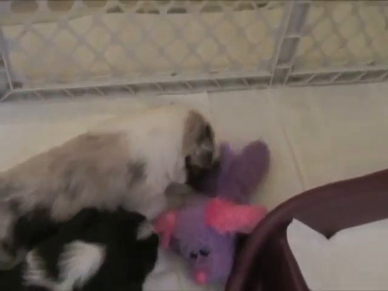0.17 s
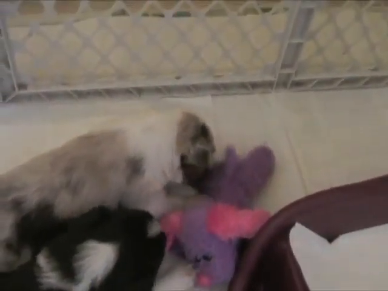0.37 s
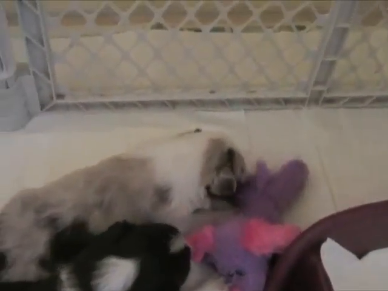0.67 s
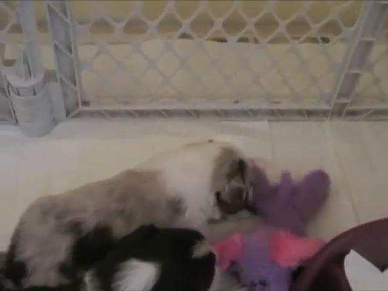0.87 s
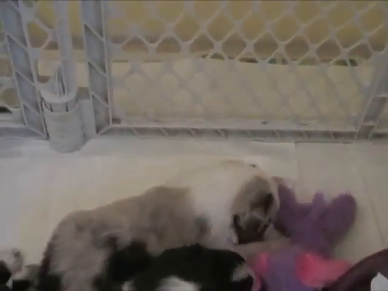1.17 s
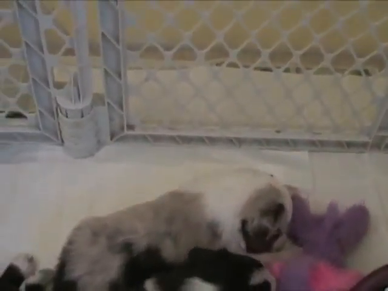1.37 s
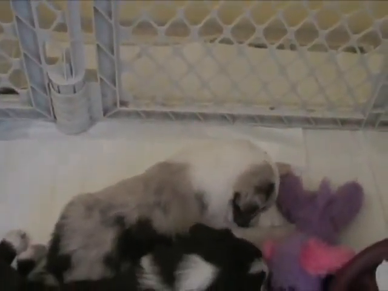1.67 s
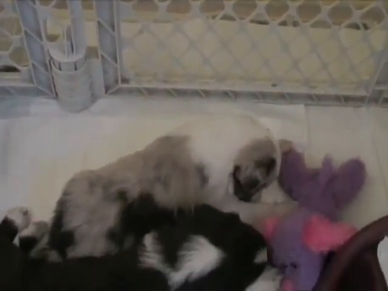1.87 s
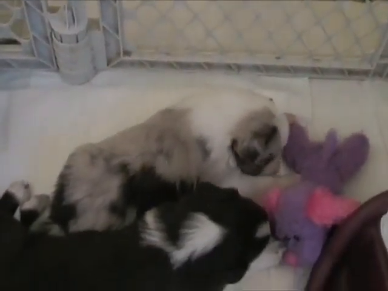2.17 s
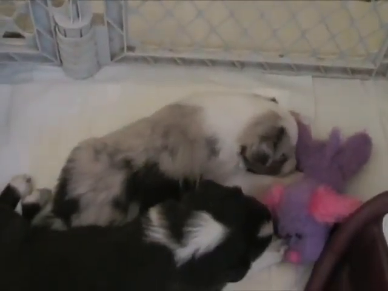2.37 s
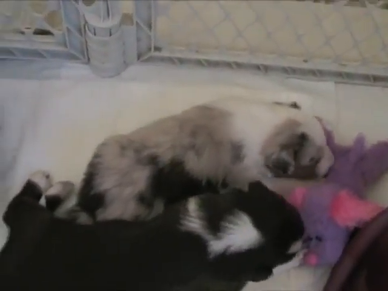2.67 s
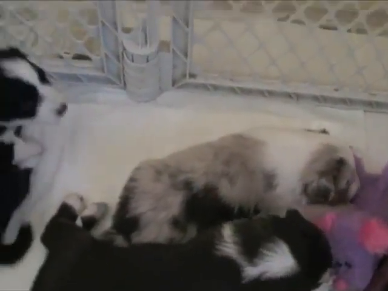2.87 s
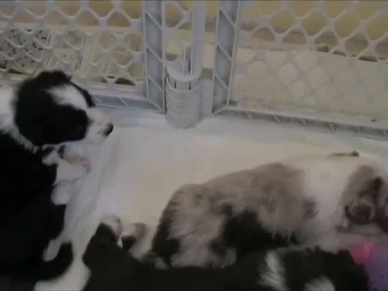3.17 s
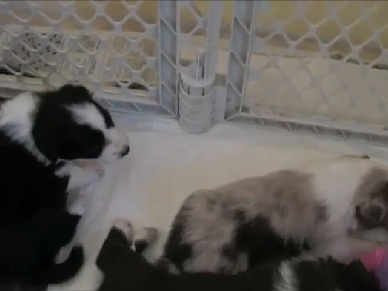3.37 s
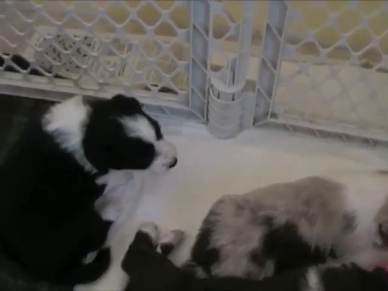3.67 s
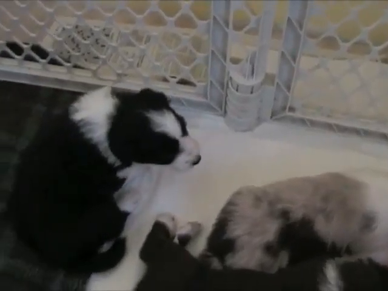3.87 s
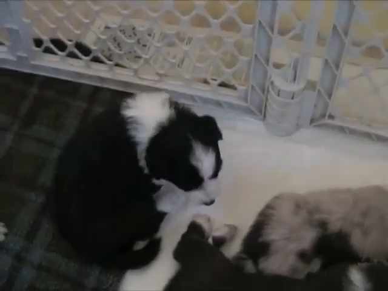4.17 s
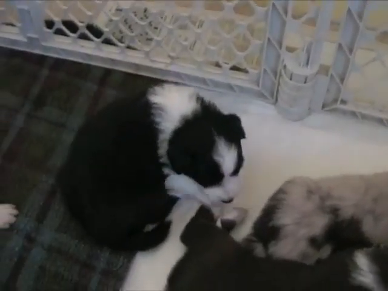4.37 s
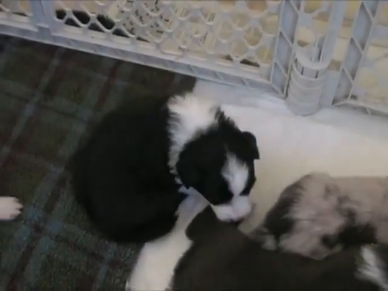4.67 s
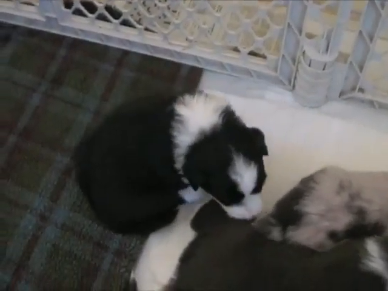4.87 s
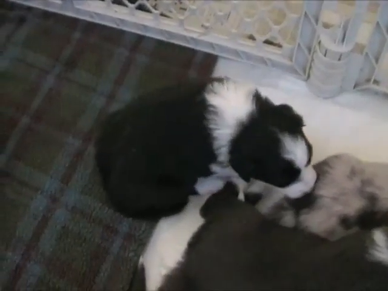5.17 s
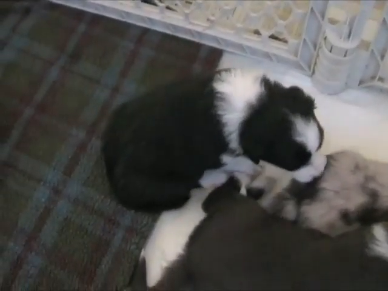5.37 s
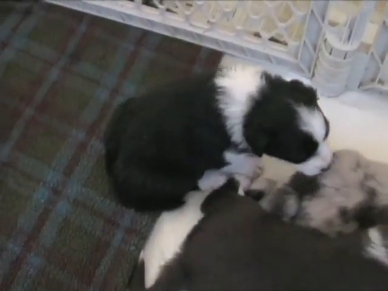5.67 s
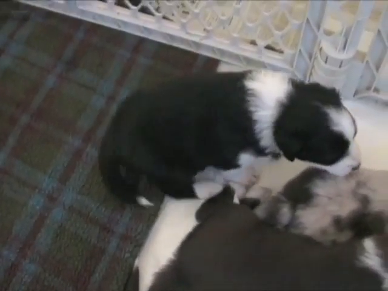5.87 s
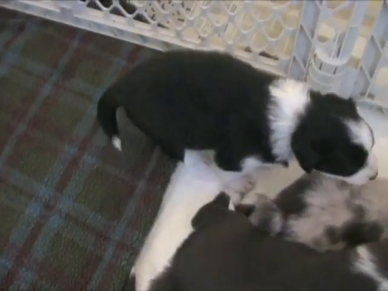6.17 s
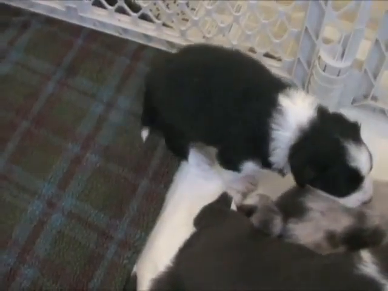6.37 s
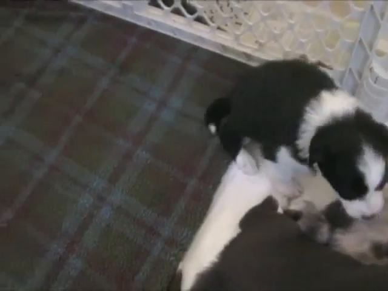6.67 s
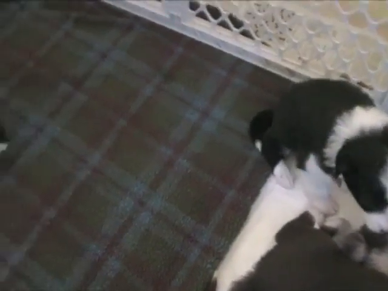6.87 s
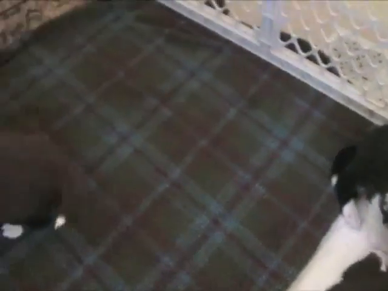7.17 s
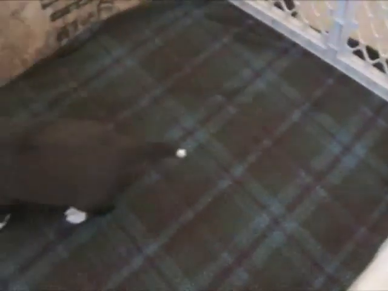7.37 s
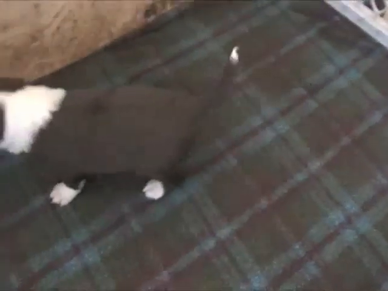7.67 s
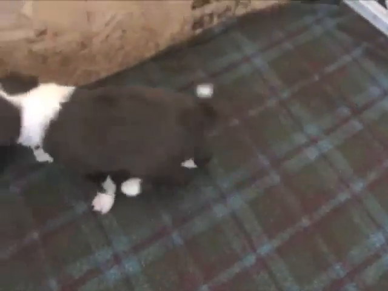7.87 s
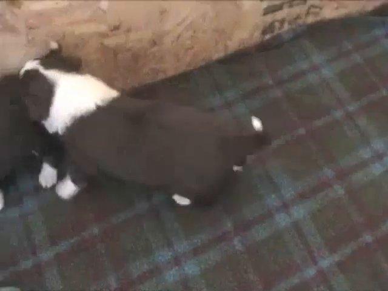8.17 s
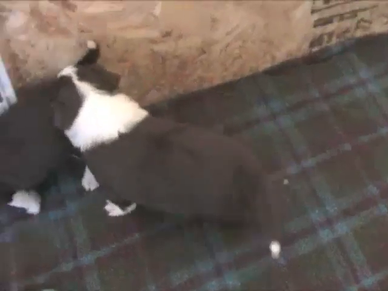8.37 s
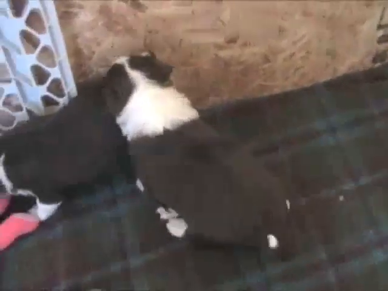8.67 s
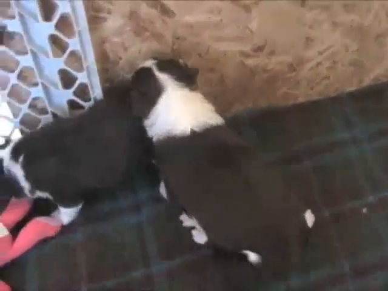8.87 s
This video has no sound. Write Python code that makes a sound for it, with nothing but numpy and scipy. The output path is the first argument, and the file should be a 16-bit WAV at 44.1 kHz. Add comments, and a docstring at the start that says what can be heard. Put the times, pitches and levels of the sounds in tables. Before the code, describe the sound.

Faint hiss and a thin camera whine, soft bumps, bedding rustle and claw ticks on a plastic pen fill the first second and a half. A puppy farther off gives a falling yelp and low woofs, then nearby puppies cry one after another in short, high, gliding calls, some hoarse or cracking. Later cries sink lower and softer, ending with rustling and a last yip. Close stereo microphones in a small, reverberant room.

```python
"""Hiss, a faint camera whine and a soft bump open the scene; bedding rustles and claws tick on a plastic pen.
Then a young puppy calls from farther off in the small room, and nearer ones cry, yip and whimper.
Each cry is a gliding harmonic voice, with rasp while the folds settle or crack; a thin high squeak closes
many of the near ones. Contacts are dying bursts of coloured noise, rubs swelling grainy noise, the whine sines.
Two close microphones hear all this with dense wall echoes, the left a little later than the right."""
import sys
import numpy as np
from scipy import signal
from scipy.fft import rfft, irfft, next_fast_len
from scipy.io import wavfile

SR = 44100
rng = np.random.default_rng(int(sys.argv[2]) if len(sys.argv) > 2 else 0)


def materialize(psi):
    """Save the field psi as 16-bit PCM at rate SR to the path in sys.argv[1].

    A 1-D psi becomes a single channel; in a 2-D psi each row is a channel.
    """
    bounded = np.clip(np.atleast_2d(psi).T, -1, 1)
    quanta = np.round(bounded * 32767).astype(np.int16)
    wavfile.write(sys.argv[1], SR, quanta)


N = 397341
TIME = np.arange(N) / SR
CUTOFF_HZ = 12700   # no voice harmonics are made above this

# the long near cries: overtones level/dB, bright upper harmonics level/dB, hoarse start t/s, rasp level/dB,
# half-pitch tone level/dB, closing squeak level/dB (practically silent near -75 and below),
# course of the voice as (t/s, f/Hz, level/dB before trim)
CRIES = [ (5.5, -40.5, 0.087, -16.5, -40, -54, [(2.67, 703.1, -35.5), (2.7, 586, -30.5), (2.722, 726, -29),
         (2.736, 766, -29), (2.764, 848.4, -23), (2.796, 849, -26), (2.81, 944, -34.5)]),
         (-0.5, -48, 0.07, -3.5, -15.5, -58, [(3.085, 503, -42.5), (3.115, 477.5, -34), (3.153, 662, -30.5),
         (3.177, 806, -37), (3.197, 883, -36.5), (3.251, 1008, -28.5), (3.291, 1085, -31.5),
         (3.329, 1050, -29.5), (3.36, 1024, -41)]), (4.5, -41.5, 0.05, -18.5, -44, -53, [(3.582, 883, -41),
         (3.594, 946, -31.5), (3.618, 825, -31), (3.632, 1035, -24.5), (3.642, 1100, -27.5),
         (3.71, 1067, -29.5), (3.73, 1105, -29.5), (3.758, 1186, -35), (3.765, 1195, -46)]),
         (7, -37.5, 0.024, -28, -35, -54, [(3.968, 1094, -37.5), (3.994, 1115, -29), (4.024, 1272, -39.5),
         (4.036, 1256, -31), (4.042, 1353, -47), (4.058, 1413, -37), (4.125, 1332, -32.5)]),
         (-4.5, -37, 0.02, -32, -10, -59, [(4.312, 988, -34), (4.32, 1001, -26), (4.352, 974, -23.5),
         (4.366, 1127, -29), (4.4, 1154, -24), (4.412, 1112, -35), (4.424, 1106, -24), (4.486, 1054, -26.5),
         (4.494, 983.5, -19), (4.524, 1036, -23.5), (4.549, 1033, -31)]),
         (-5.5, -38.5, 0.0247, -1, -18, -56, [(4.736, 794, -31), (4.752, 735, -32), (4.772, 802, -23),
         (4.784, 807, -26.5), (4.802, 946, -18.5), (4.816, 985, -20.5), (4.856, 917, -22),
         (4.864, 896, -47)]), (1, -44, 0.029, 2.5, -25, -79, [(5.217, 547, -38), (5.235, 533.3, -41),
         (5.249, 566.6, -24.5), (5.285, 817, -27.5), (5.301, 915, -20), (5.315, 968, -31.5),
         (5.327, 907, -38)]), (1, -36, 0.018, -22, -38, -51, [(5.625, 1222, -37), (5.647, 1230, -26.5),
         (5.669, 1372, -34), (5.677, 1370, -28.5), (5.737, 1322, -30.5), (5.751, 1378, -25),
         (5.765, 1350, -34)]), (-0.5, -44.5, .02, -29, -43, -79, [(5.972, 1168, -34.5), (5.99, 1087, -29.5),
         (6.01, 1028, -26.5), (6.03, 1127, -29), (6.07, 1087, -27.5), (6.098, 1046, -26),
         (6.136, 1057, -28.5), (6.158, 1100, -29), (6.17, 1130, -50)]),
         (1, -48, .017, -36, -42, -62, [(6.38, 968, -30), (6.406, 923.5, -22.5), (6.442, 1065, -28.5),
         (6.456, 1088, -24.5), (6.48, 975, -23), (6.52, 906, -20.5), (6.548, 947, -23), (6.564, 961.6, -25),
         (6.588, 894, -22), (6.606, 894, -24.5), (6.618, 973, -24), (6.644, 1042, -29)]),
         (-4.5, -44, 0.063, -1.5, -10.5, -75, [(6.883, 847, -36), (6.907, 807.6, -36.5),
         (6.921, 749, -31.5), (6.945, 860, -28), (6.965, 892, -25.5), (6.989, 866, -24), (7.021, 918, -27),
         (7.067, 862, -24.5), (7.107, 861.8, -25.5), (7.169, 938, -27.5)]),
         (0.5, -46, 0.049, -1.5, -9, -80, [(7.415, 456.4, -40.5), (7.449, 467.3, -34.5),
         (7.527, 518.5, -33), (7.555, 504.6, -33), (7.599, 528, -36), (7.607, 514, -35), (7.667, 517, -31),
         (7.681, 539.3, -32), (7.697, 520.2, -31.5), (7.725, 523.3, -31), (7.807, 511.2, -30.5),
         (7.827, 508.3, -30), (7.861, 529.5, -36), (7.92, 515, -42.5)]),
         (-0.5, -51, 0.033, -2.5, -13.5, -80, [(8.39, 463, -42.5), (8.42, 441, -38.5),
         (8.474, 540.3, -39.5), (8.524, 530.5, -38), (8.544, 564, -37.5), (8.606, 572.5, -37),
         (8.666, 523.7, -34), (8.68, 552, -43), (8.704, 556, -42), (8.726, 509, -35.5), (8.77, 487, -36.5),
         (8.794, 513.5, -38), (8.82, 640, -34)]), ]
# colour that the mouth gives to upper harmonics and breath: f/Hz, level/dB
MOUTH = [(500, -36), (1900, -11), (2500, -6.5), (2850, -6), (3300, -3), (3900, -11.5), (4600, -1.5),
         (5500, 5.5), (6200, -2), (6800, 2), (8300, 5.5), (9500, -6.5), (11500, -39)]


def from_db(db):
    """Decibels to gain."""
    return 10 ** (np.asarray(db) / 20)


def rms_one(x):
    """Scale to unit rms."""
    return x / np.sqrt(np.mean(x ** 2) + 1e-20)


def at_hz(points, hz, axis=1):
    """Read a column of a table on a log-frequency axis."""
    points = np.array(points)
    return np.interp(np.log(np.maximum(hz, 1)), np.log(points[:, 0]), points[:, axis])


def coloured(x, spectrum):
    """Filter a sound by a table of f/Hz and level/dB; unit rms."""
    padded = next_fast_len(len(x))
    hz = np.fft.rfftfreq(padded, 1 / SR)
    filtered = irfft(rfft(x, padded) * from_db(at_hz(spectrum, hz)), padded)
    return rms_one(filtered[:len(x)])


def noise(spectrum, size=N):
    """Unit-rms noise with the given colour."""
    return coloured(rng.standard_normal(size), spectrum)


def drift(rate, size=N):
    """Random wander: straight lines between `rate` normal random values a second."""
    steps = np.arange(size) * rate / SR
    knots = np.arange(int(steps[-1]) + 2)
    return np.interp(steps, knots, rng.standard_normal(len(knots)))


def gate(t, start, end, edge):
    """One between start and end, with smooth edges centred on both."""
    return np.sin(np.pi / 2 * np.clip(np.minimum(t - start, end - t) / edge + .5, 0, 1)) ** 2


def span(start, end):
    """Sample indices of a stretch, with a little room on both sides."""
    return np.arange(max(int((start - .01) * SR), 0), min(int((end + .025) * SR), N))


def background(whine_flutter_db=1.5, whine_waver=0.27):
    """Room rumble and microphone hiss, part common and part opposed, with the camera's wavering whine."""
    # noise alike at both microphones: f/Hz, level/dB per Hz
    common_colour = [(20, -23), (60, -5.5), (130, -3), (300, -2.5), (500, -4), (780, -3.5), (1020, -3),
                     (1400, -10.5), (2600, -13), (3600, -14.5), (5000, -11), (6500, -16.5), (10600, -20),
                     (11900, -39.5)]
    # noise of opposite sign at the two microphones: f/Hz, level/dB per Hz
    opposed_colour = [(10, -22), (25, -11), (60, -4.5), (110, -4), (220, -9), (450, -17.5), (800, -24.5),
                      (1000, -23.5), (1400, -34.5), (3200, -41.5), (5100, -30), (6500, -41), (11000, -32.5),
                      (12300, -57)]
    # steady tones of the camera: f/Hz, level/dB
    whine_tones = [(2708, -72), (4797, -73.5), (5093, -72), (5394, -74), (5696, -75)]
    whine = 0
    for hz, db in whine_tones:
        level = from_db(db + whine_flutter_db * drift(22))
        whine = whine + level * np.sqrt(2) * np.sin(2 * np.pi * hz * TIME + whine_waver * drift(40))
    common = from_db(-54) * noise(common_colour)
    opposed = from_db(-43.0) * noise(opposed_colour)
    return common + whine + opposed * np.array([[1], [-1]])


def add_burst(out, s, level_db, spectrum, t60, rise=.0001):
    """A contact: coloured noise that rises quickly (slower for a soft body) and dies away."""
    start, t = max(int(s * SR), 0), TIME[:16384]
    decay = from_db(-60 * t / t60)
    burst = noise(spectrum, size=len(t)) * decay * (1 - np.exp(-t / rise))
    out[start:start + len(burst)] += from_db(level_db) * burst[:N - start]


def bumps(skirt_db=-28.5):
    """Paws and bodies bump the floor and pen: soft blows excite a band around their centre."""
    # the blows: t/s, level/dB, centre f/Hz, time to fall 60 dB t/s
    blows = [(0.0, -51.5, 710, 0.83), (0.424, -40, 480, 0.029), (0.64, -29, 585, 0.081),
             (1.052, -49, 400, 0.046), (1.24, -42, 310, 0.11), (1.44, -37, 474, 0.084),
             (6.036, -47, 113, 0.14), (6.611, -44.5, 210, .12), (6.631, -44.5, 110, 0.17),
             (6.905, -33, 180, 0.046), (7.984, -32, 216, 0.095), (7.99, -36, 142.8, 0.092),
             (8.769, -57, 140, 0.2)]
    out = np.zeros(N)
    for s, db, hz, t60 in blows:
        low_side = [(hz / 10, -40), (hz / 2, skirt_db), (hz * 0.96, 0)]
        high_side = [(hz * 1.07, 0), (hz * 2, skirt_db), (hz * 10, -70)]
        add_burst(out, s, db, low_side + high_side, t60, rise=0.0019)
    return out


def rustle(level_db=5.0, grain_db=3.5, clump_db=-0.5):
    """Paws rub bedding: each rub swells to a rounded top and fades; fibres catch and slip in clumps."""
    # the rubs: peak t/s, swell t/s, fade t/s, level/dB before trim
    rubs = [(0.05, 0.01, 0.012, -62), (0.22, .16, 0.13, -52), (0.585, 0.087, 0.065, -56.5),
            (8.742, 0.018, 0.031, -46.5), (8.815, 0.036, 0.034, -48.5), (8.868, 0.041, 0.017, -38)]
    # colour of the bedding: f/Hz, level/dB per Hz
    bedding = [(530, -10.5), (900, -6.5), (1990, 2), (2620, -2), (4110, 0), (6040, -3.5), (8410, 0.5),
               (10300, -1.5), (12500, -29), (16200, -63), (22000, -120)]
    level = 0
    for s, swell, fade, db in rubs:
        away = np.maximum((s - TIME) / swell, (TIME - s) / fade)
        level = level + from_db(db) / (1 + from_db(12) * away ** 3)
    grain = from_db(grain_db * drift(400) + clump_db * drift(90))
    return from_db(level_db) * level * rms_one(noise(bedding) * grain)


def ticks(body_db=-2.5, edge_db=7.0):
    """Claws and teeth on the plastic fence: each tick has a hollow body and a sharper, shorter edge."""
    # the contacts: t/s, body level/dB before trim, edge level/dB before trim
    contacts = [(0.262, -34.5, -51), (0.5985, -41, -47), (0.6377, -37, -58), (0.7629, -41.5, -67),
                (0.807, -45, -60), (1.917, -30.5, -64), (1.961, -33.5, -50), (2.588, -67, -40),
                (3.2551, -38, -40), (5.8745, -35, -44.5), (5.9018, -39, -46), (6.0004, -40, -37.5),
                (6.545, -40, -46), (6.825, -55, -48), (7.235, -29.5, -33.5), (7.3147, -38, -39),
                (7.7318, -33.5, -36), (8.3035, -42, -55), (8.7246, -31, -59)]
    # colour of the hollow body: f/Hz, level/dB per Hz
    body_colour = [(400, -7), (1200, -1.5), (2400, 0), (3300, -3), (4800, -10.5), (7000, -41), (12000, -51)]
    # colour of the sharp edge: f/Hz, level/dB per Hz
    edge_colour = [(2500, -36), (5000, 4.5), (8000, 3.5), (10500, -5), (13000, -30.5)]
    out = np.zeros(N)
    for s, body, edge in contacts:
        add_burst(out, s, body + body_db, body_colour, t60=0.039)
        add_burst(out, s, edge + edge_db, edge_colour, t60=0.014)
    return out


def overtone_balance(t, s, pitch):
    """Change of overtones in dB: the voice is purer as the folds start and stop and where it flips high."""
    starting = -13 * np.exp(-np.maximum(t - s[0], 0) / 0.004)
    stopping = -9 * np.exp(-np.maximum(s[-1] - t, 0) / 0.032)
    # falsetto: octaves above 750 Hz and above the cry's usual pitch
    falsetto = np.maximum(np.log2(pitch / max(np.median(pitch), 750)), 0)
    return starting + stopping - 20.5 * falsetto


def harmonics(phase, pitch, throat, overtone_db, shimmer_db=1.17):
    """The six lowest harmonics fall off from the folds and slide through the throat's resonances."""
    folds_db_per_octave = -10
    orders = np.arange(1, 7)[:, None]
    folds_db = folds_db_per_octave * np.log2(orders) + overtone_db * (orders > 1)
    gains = from_db(at_hz(throat, orders * pitch) + folds_db)
    shimmer = from_db(shimmer_db * np.array([drift(150, len(pitch)) for _ in orders]))
    return (gains * shimmer * np.sin(orders * phase)).sum(0) / np.sqrt((gains ** 2).sum(0))


def upper_harmonics(phase, pitch, half, dull_db, flutter_db, limp):
    """A bright series at one shared level slides through the mouth; distance dulls it per octave."""
    orders = np.arange(2, 26)[:, None]
    flutter = flutter_db * np.array([drift(42.3, len(pitch)) for _ in orders])
    weights_db = at_hz(MOUTH, orders * pitch) + flutter + dull_db * np.log2(orders)
    weights = from_db(weights_db) * (orders * pitch < CUTOFF_HZ)
    # long and short cycles in turn fill the gaps between high harmonics
    uneven = phase + limp * half * np.sin(phase / 2)
    return (weights * np.cos(orders * uneven)).sum(0) / np.sqrt((weights ** 2).sum(0))


def rasp_and_air(phase, sharpness=31.0, uneven_db=6.0, turbulence=3.8):
    """The folds snap shut on every second cycle with uneven force, each time with a puff of turbulent air."""
    # colour of the rasp: f/Hz, level/dB per Hz
    rasp_colour = [(60, -46), (200, -5), (450, -14), (760, 11), (1150, -27), (1600, -2), (2300, -25.5),
                   (3200, -33), (7000, -35.5), (12000, -43)]
    snaps = np.exp(sharpness * (np.cos(phase / 2) - 1)) * from_db(uneven_db * drift(300, len(phase)))
    puffs = snaps * rng.standard_normal(len(phase))
    rasp = coloured(snaps - snaps.mean() + turbulence * puffs, rasp_colour)
    air = coloured(puffs, MOUTH + [(14000, -43)])
    return rasp, air


def cry(course, overtone_db, shrill_db, hoarse_s, rasp_db, half_db, throat, dull_db, jitter=0.0068,
        hoarse_jitter=0.0416, hoarse_shimmer_db=5.0, flutter_db=8.0, tremor_db=1.5, waver=0.008, limp=3.5,
        voice_db=-0.4, bright_db=-5.0, tension_db=10.5, upper_half_db=3.5, settling=4.8, edge=0.0037,
        release_cycles=3.7):
    """Vocal folds: strong low harmonics, a bright series from the mouth, rasp until they settle or on cracks."""
    # the voice cracks in mid-cry: start t/s, end t/s, rasp level/dB, half-pitch tone level/dB
    cracks = [(1.824, 1.924, -11.5, -26), (4.345, 4.542, -25, -28), (4.77, 4.795, -13, -45),
              (5.28, 5.33, -10.5, -37), (8.674, 8.83, -10, -18)]
    s, *columns = np.transpose(course)
    n = span(s[0], s[-1])
    t, size = n / SR, len(n)
    age = np.maximum(t - s[0], 0)
    pitch, loudness = [np.interp(t, s, column) for column in columns]
    starting = gate(t, s[0], np.inf, edge)
    stopping = gate(t, -np.inf, s[-1] + edge / 2, release_cycles / pitch[-1])

    # the upper harmonics come in as the mouth opens, and share a fifth of the swing in loudness
    bright = shrill_db + 0.2 * (loudness - loudness.max()) - 8.5 * np.exp(-age / 0.02)
    # octaves below 852 Hz, where the folds are slack and waver
    slack = np.maximum(np.log2(852 / pitch), 0)
    unsettled = np.exp(-(age / hoarse_s) ** settling)
    hoarse = from_db(rasp_db) * unsettled
    half = from_db(half_db) * unsettled
    for start, end, crack_rasp_db, crack_half_db in cracks:
        cracked = gate(t, start - edge, end + edge, edge)
        hoarse = hoarse + from_db(crack_rasp_db) * cracked
        half = half + from_db(crack_half_db) * cracked

    wander = waver * slack * drift(24.03, size) + jitter * drift(249.5, size)
    pitch = pitch * (1 + wander + hoarse_jitter * hoarse * drift(396, size))
    phase = 2 * np.pi * np.cumsum(pitch) / SR

    low = harmonics(phase, pitch, throat, overtone_db + overtone_balance(t, s, pitch))
    low = low * from_db(hoarse_shimmer_db * hoarse * drift(500, size))
    # slack folds close softly and give weaker upper harmonics
    upper = upper_harmonics(phase, pitch, half, dull_db, flutter_db, limp)
    upper = upper * from_db(bright + bright_db - tension_db * slack)
    # strong and weak cycles in turn put tones halfway between the harmonics
    doubled = half * (np.sin(phase / 2) + from_db(upper_half_db) * np.sin(3 * phase / 2))
    rasp, air = rasp_and_air(phase)

    tonal = np.sqrt(2) * (low + doubled)
    body = (tonal + hoarse * rasp) / np.hypot(1, hoarse)
    body = body * from_db(loudness + voice_db + tremor_db * drift(45, size))
    breath = from_db(bright - 15) * air
    voice = (body + np.sqrt(2) * upper + breath) * starting * stopping
    # so small a body radiates little below 226 Hz
    out = np.zeros(N)
    out[n] = signal.sosfilt(signal.butter(2, 226, "high", fs=SR, output="sos"), voice)
    return out


def short_call(row, throat, dull_db, half_below_db=-23.5):
    """A short call: one straight glide that peaks early in loudness, then sags."""
    start, length, first_hz, last_hz, db, overtone_db, shrill_db, rasp_db = row
    share = np.array([0, 0.25, 1])   # start, peak and end as parts of the length
    pitch = first_hz + (last_hz - first_hz) * share
    course = np.transpose([start + length * share, pitch, db + np.array([-7, 0, -2.5])])
    return cry(course, overtone_db, shrill_db, length, rasp_db, rasp_db + half_below_db, throat, dull_db)


def far_puppy(dull_db=-9.5):
    """From farther off, with a duller top: one unsteady, falling yelp, then short low sounds."""
    # the yelp: t/s, f/Hz, level/dB before trim
    yelp_course = [(1.757, 1286, -44), (1.765, 1250, -25), (1.779, 1269, -31.5), (1.801, 1108, -19.5),
                   (1.817, 1115, -25.5), (1.829, 979.5, -29), (1.851, 908.5, -24.5), (1.863, 765, -28.5),
                   (1.907, 749.5, -31), (1.92, 733, -31)]
    # low woofs, the second row perhaps only the room ringing after the first: start t/s, length t/s,
    # first f/Hz, last f/Hz, level/dB before trim, overtones level/dB, bright upper harmonics level/dB,
    # rasp level/dB
    low_sounds = [(2.053, 0.053, 368.7, 357.3, -31, 6, -47, -7.5),
                  (2.147, 0.061, 367, 373.6, -35.5, -12, -59, -30),
                  (2.346, 0.041, 360.5, 355.5, -37, 0.5, -47, -18)]
    # resonances of the far puppy's throat: f/Hz, level/dB
    far_throat = [(360, 2), (730, 13.5), (1100, 8), (1600, 4.5), (2000, 9.5), (2400, 2), (2650, -11),
                  (3600, 1), (3900, -11), (4500, 6), (5200, -12), (7000, -20)]
    yelp = cry(yelp_course, overtone_db=13.5, shrill_db=-36.5, hoarse_s=0.027, rasp_db=-26.0,
               half_db=-40.0, throat=far_throat, dull_db=dull_db, jitter=0.012)
    return yelp + sum(short_call(row, far_throat, dull_db) for row in low_sounds)


def near_puppies():
    """Close to the microphones: long cries with short yips between them."""
    # the yips: start t/s, length t/s, first f/Hz, last f/Hz, level/dB before trim, overtones level/dB,
    # bright upper harmonics level/dB, rasp level/dB
    yips = [(4.223, 0.05, 1545, 1360, -38.5, 16, -49.5, -36),
            (4.254, 0.044, 1393, 1474, -36.5, 1, -63, -24), (5.043, 0.043, 462, 514, -38, 10, -41, 4.5),
            (5.379, .032, 1051, 994, -34, 6, -48, -13), (8.972, 0.034, 809, 844, -28, -9, -47, -13)]
    # resonances of a near puppy's throat: f/Hz, level/dB
    near_throat = [(400, -4.5), (520, 1.5), (900, 0.5), (1100, -2.5), (1300, -1.5), (1500, 4.5),
                   (1700, 11.5), (1900, 1), (2150, -3.5), (2350, -1), (2600, -14), (3200, -41.5),
                   (6000, -48)]
    cries = sum(cry(course, *voice, near_throat, 0) for *voice, _, course in CRIES)
    return cries + sum(short_call(row, near_throat, 0) for row in yips)


def whistle(start, end, first_hz, last_hz, level_db, waver):
    """A thin, unsteady gliding tone: one sine with a wavering pitch."""
    out, n = np.zeros(N), span(start, end)
    t = n / SR
    pitch = np.interp(t, [start, end], [first_hz, last_hz]) * (1 + waver * drift(270, len(n)))
    tone = np.sqrt(2) * np.sin(2 * np.pi * np.cumsum(pitch) / SR)
    out[n] = from_db(level_db) * tone * gate(t, start, end, 0.0025)
    return out


def thin_tones():
    """Whimpers, and a falling squeak, as the throat closes, that ends many of the long near cries."""
    # thin whimpers among the cries: start t/s, end t/s, first f/Hz, last f/Hz, level/dB
    whimpers = [(3.233, 3.297, 1466, 1416, -36), (3.281, 3.38, 1487, 1326, -43.5),
                (4.52, 4.552, 1550, 1440, -37.5), (4.78, 4.81, 1497, 1370, -36.5),
                (5.037, 5.063, 1400, 1275, -43), (8.634, 8.717, 1560, 1325, -51.5),
                (8.728, 8.79, 1280, 1150, -47.5)]
    out = sum(whistle(*row, waver=.006) for row in whimpers)
    for *_, squeak_db, course in CRIES:
        start = course[-1][0] - .012   # just before the cry ends
        out = out + whistle(start, start + .022, 11900, 11300, squeak_db, waver=.012)
    return out


def room(x, delay_s=0.0017, spread_db=-17.5):
    """Dense wall echoes die band by band, more alike at the two close microphones the lower the band."""
    # the small room: f/Hz, time to fall 60 dB t/s, echo level/dB before each source's own trim
    walls = [(149, 0.62, -4), (410, 0.43, 2), (885, 0.76, 0), (2010, 0.56, -1), (4000, 0.45, -2),
             (10500, 0.15, 1.5)]
    t, response = TIME[:SR], 0
    edges = np.geomspace(80, 14000, num=9)
    for low, high in zip(edges, edges[1:]):
        hz = np.sqrt(low * high)
        band_pass = signal.butter(2, [low, high], "band", fs=SR, output="sos")
        band = signal.sosfilt(band_pass, rng.standard_normal((2, SR)))
        decay = from_db(-60 * t / at_hz(walls, hz)) * (t > delay_s)
        level = from_db(at_hz(walls, hz, axis=2))
        mid, side = band * decay / np.sqrt(np.sum(decay ** 2)) * level
        width = min(from_db(spread_db) * hz / 1000, 1)
        response = response + (mid + width * side * np.array([[1], [-1]])) / np.hypot(1, width)
    return signal.fftconvolve(x[None], response, axes=1)[:, :N]


def scene():
    """The puppies are a little to the right: the left microphone hears them later and mostly softer."""
    # balance of the two microphones: t/s, left minus right level/dB
    balance = [(1.8, 0.2), (2.2, -1), (2.8, 0.1), (4.8, -0.9), (5.7, -0.9), (8.7, -3)]
    left_lag_s = 3.7e-5
    knocks, far = bumps(), far_puppy()
    near = rustle() + ticks() + near_puppies() + thin_tones()
    direct = near + far + knocks
    # a windowed sinc delays by a fraction of a sample
    taps = np.arange(-16, 17)
    late = np.convolve(direct, np.sinc(taps - left_lag_s * SR) * np.hanning(len(taps)), "same")
    # against its direct sound, the far puppy sends more into the room than the near ones
    echoes = room(from_db(-7.5) * near + from_db(-4) * far + from_db(-5.5) * knocks)
    pan_db = np.interp(TIME, *np.transpose(balance))
    return (np.array([late, direct]) + echoes) * from_db([pan_db / 2, -pan_db / 2]) + background()


def record(dry):
    """The top is cut steeply, to 60 dB down at 500 Hz above the cutoff."""
    low_pass = signal.cheby2(16, 60, CUTOFF_HZ + 500, fs=SR, output="sos")
    return signal.sosfilt(low_pass, dry)


dry = scene()
out = record(dry)
materialize(out)
```